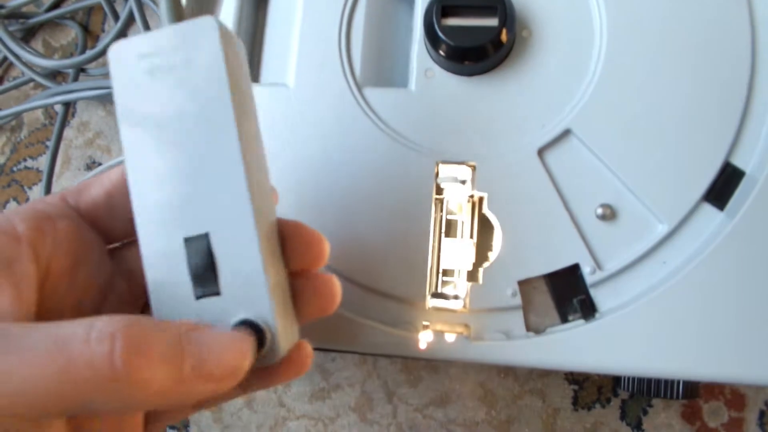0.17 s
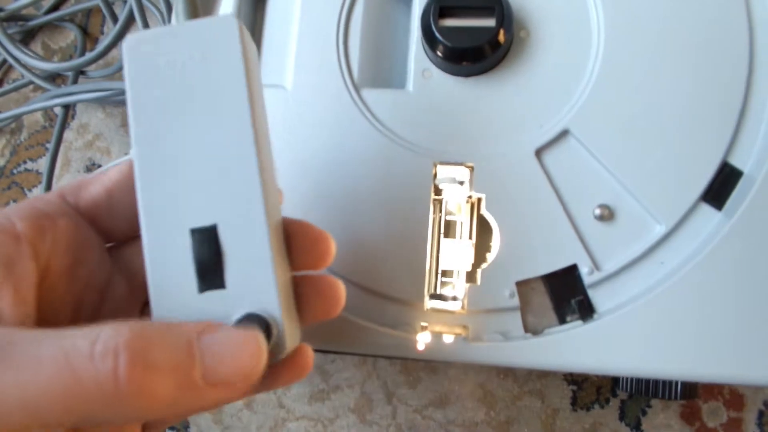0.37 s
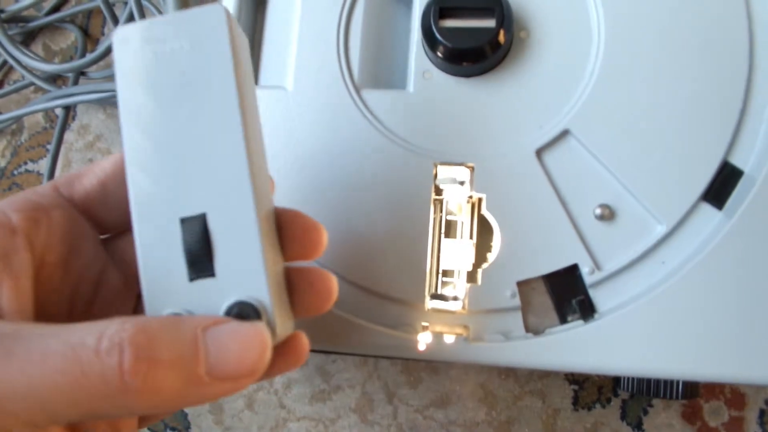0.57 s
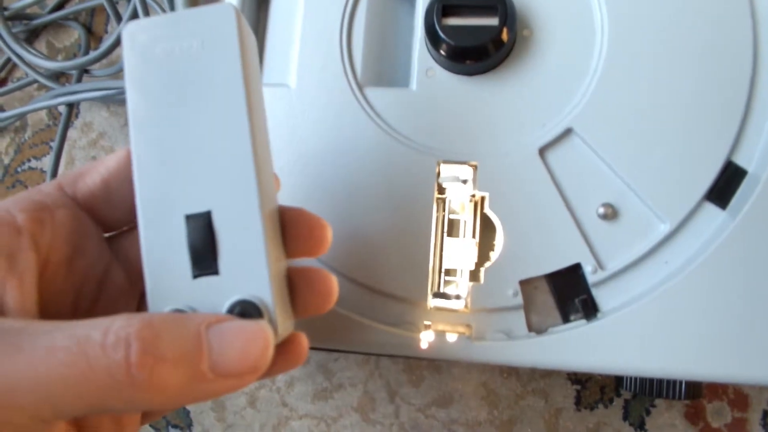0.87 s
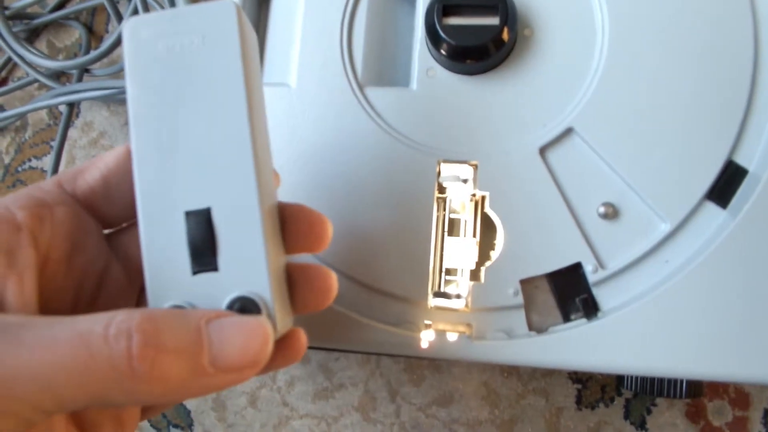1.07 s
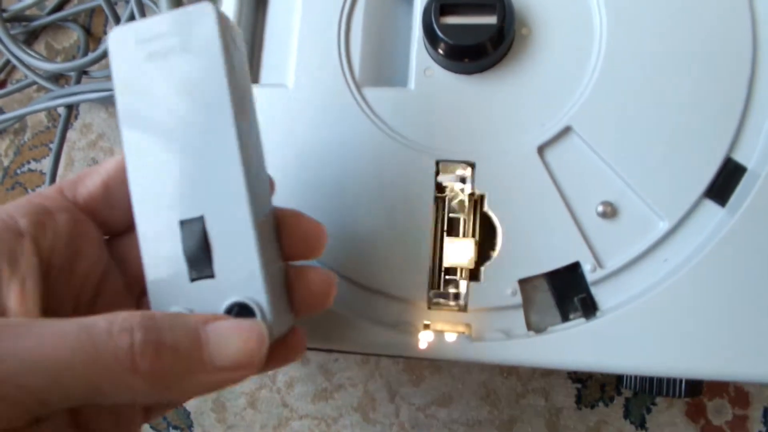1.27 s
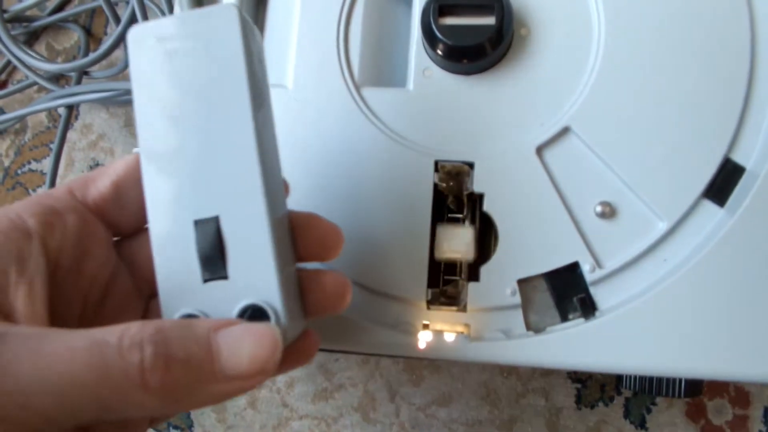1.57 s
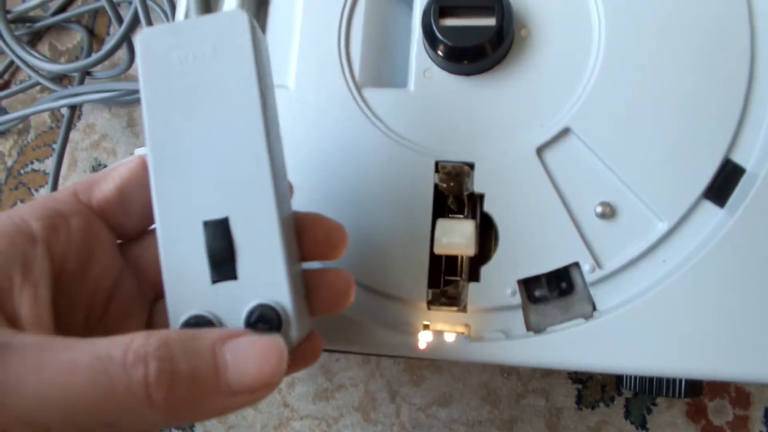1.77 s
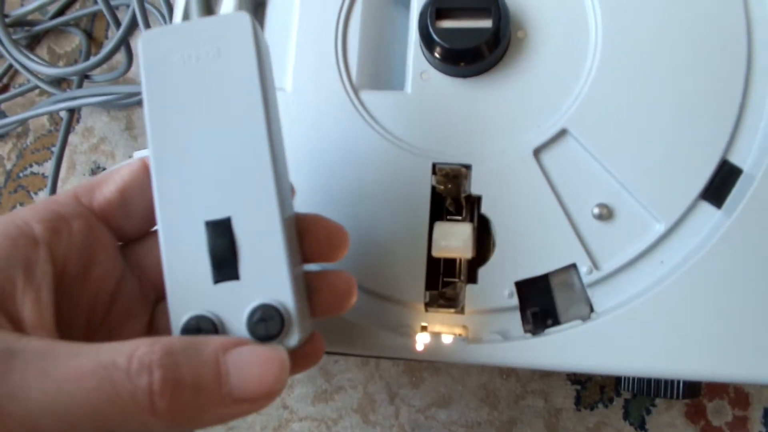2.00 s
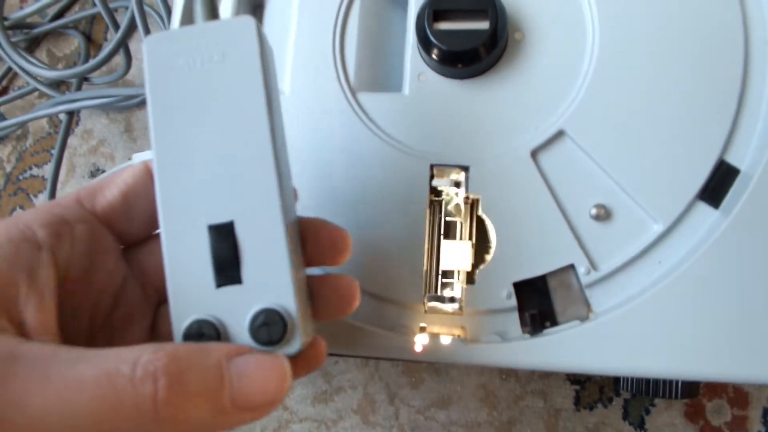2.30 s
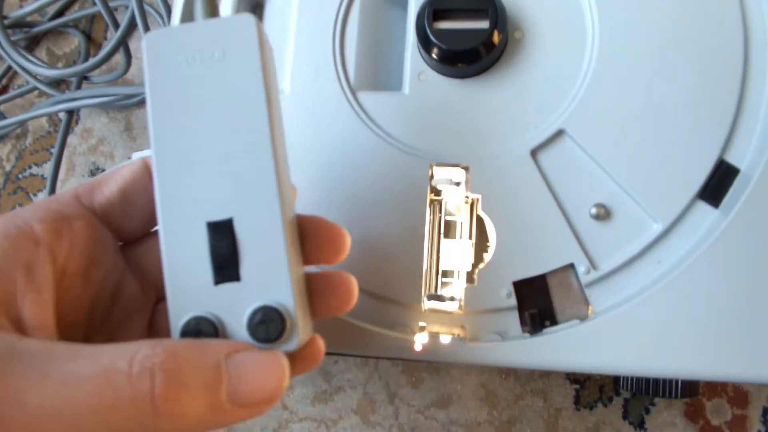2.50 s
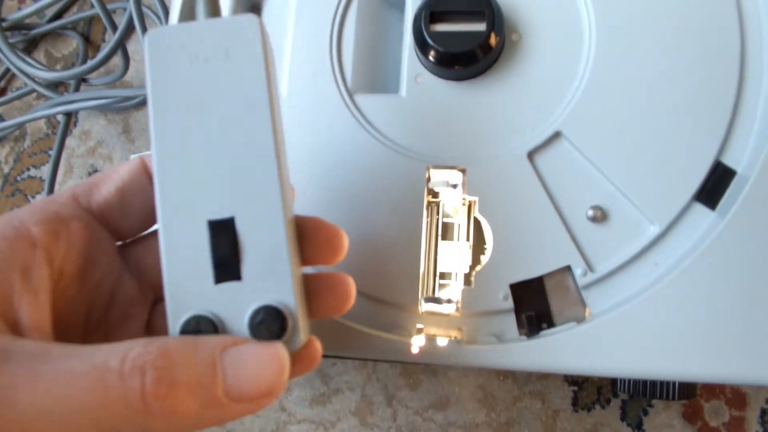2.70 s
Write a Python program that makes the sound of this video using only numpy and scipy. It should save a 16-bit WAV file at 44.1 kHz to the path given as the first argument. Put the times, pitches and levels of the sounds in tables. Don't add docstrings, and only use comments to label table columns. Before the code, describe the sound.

A slide projector finishes one change with a quick burst of clacks, idles with its fan whirring, then runs through a longer clattering change and settles, heard close in stereo in a small carpeted room.

```python
import sys
import numpy as np
from scipy import signal
from scipy.fft import rfft, irfft, next_fast_len
from scipy.io import wavfile
from scipy.ndimage import uniform_filter1d

SR = 44100
rng = np.random.default_rng(int(sys.argv[2]) if len(sys.argv) > 2 else 0)


def unload_audio(sound):
    columns = np.transpose(np.atleast_2d(sound))
    steps = np.round(np.clip(columns, -1, 1) * 32767)
    wavfile.write(sys.argv[1], SR, steps.astype(np.int16))


def rack_gain(trim_db):
    fader = np.asarray(trim_db, float)
    return 10 ** (fader / 20)


N = 125685

# (frequency [Hz], density [dB per Hz])
AIR_COLOUR = [(15, -80), (25, -36), (318, -6.5), (761, -4.5), (824, -7.5), (966, -12.5), (1160, -14),
              (14000, -44.5)]
# (frequency [Hz], width [Hz], lift [dB])
DUCT_RESONANCES = [(265, 32, -2), (312, 101, 10.5), (620.3, 47, 9), (1585, 410, 5.5), (3060, 1070, 5.5),
                   (5160, 480, 6), (7200, 430, 9)]
# (time [s], speed [turns/s])
SHAFT_SPEED = [
    (0, 46.7),
    (.25, 47.4),
    (1.2, 47.4),
    (1.35, 46.9),
    (1.6, 46.7),
    (1.75, 47),
    (2, 46.2),
    (2.15, 46.8),
    (2.4, 46.9),
    (2.55, 47.4),
]
# (shaft order, mains sideband, idle level [dB], loaded level [dB])
MOTOR_TONES = [(15, 0, -61, -60), (18, 0, -66, -52), (19, 0, -63, -63), (24, 0, -57, -60),
               (15, 1, -50, -60)]
# (time [s], peak [dB], chatter t60 [s], centre [Hz])
STEEL_TICKS = [(.0218, -19.5, 0.028, 9300), (.1241, -32, 0.023, 11700), (.129, -32, 0.077, 7940),
               (.1404, -40, .012, 8000), (.1645, -39, 0.053, 10300), (.188, -38, 0.084, 10000),
               (1.1363, -35, 0.0076, 11000), (1.147, -28, 0.035, 9800), (1.1635, -28.5, 0.034, 9000),
               (1.1907, -51, 0.026, 5860), (1.2473, -33.5, 0.02, 11200), (1.2822, -32, 0.013, 12000),
               (1.4596, -37, 0.053, 9700), (1.4815, -24.5, 0.06, 10100), (1.6187, -33.5, 0.013, 7000),
               (1.6318, -35, 0.017, 6100), (1.6464, -33.5, 0.014, 7460), (1.7458, -37, 0.0079, 7100),
               (1.7520, -18, 0.022, 6450), (1.7765, -32.5, 0.031, 10700), (1.8205, -35.5, 0.015, 8800),
               (1.8427, -28, 0.012, 12200), (1.9022, -40.5, 0.034, 8260), (2.2184, -46, 0.05, 6400),
               (2.2697, -20.5, 0.029, 8600), (2.3725, -28, 0.016, 11900)]
# (time [s], peak [dB], chatter t60 [s], centre [Hz])
GATE_SETTLING = [
    (2.377, -38, 0.25, 8900),
    (2.387, -23.5, 0.0064, 7440),
    (2.434, -40, 0.064, 13800),
    (2.794, -43, 0.0062, 5960),
]
# (time [s], peak [dB], chatter t60 [s], centre [Hz])
LEVER_CLACKS = [(.0225, -30, 0.023, 2750), (.0832, -39, 0.029, 1770), (0.1235, -25, 0.12, 2030),
                (0.1622, -31.5, 0.11, 2210), (0.188, -36.5, 0.12, 2220), (1.150, -19.5, 0.069, 2010),
                (1.1640, -23, 0.037, 2370), (1.1907, -30.5, 0.022, 1500), (1.212, -33, 0.021, 2440),
                (1.2477, -21.5, 0.0071, 1740), (1.282, -24.5, 0.023, 1970), (1.481, -29, 0.084, 2640),
                (1.6468, -30.5, 0.013, 3000), (1.7458, -31, 0.031, 2250), (1.7512, -24, 0.049, 2840),
                (1.7755, -35.5, 0.067, 2300), (1.8430, -31, 0.022, 2500), (2.1900, -32, 0.022, 1520),
                (2.218, -30.5, 0.039, 2500), (2.2700, -31, 0.03, 2460), (2.3725, -24.5, 0.069, 1960),
                (2.3875, -25, 0.071, 2300), (2.3976, -23, 0.068, 1630), (2.4104, -31.5, 0.19, 2260),
                (2.4353, -38, 0.21, 2070)]
# (time [s], peak [dB], chatter t60 [s], centre [Hz])
LEVER_TAPS = [(.0835, -34, 0.011, 1790), (.1717, -31, 0.014, 1950), (.195, -37, 0.0091, 2540),
              (1.899, -43, .005, 2800), (1.9035, -43.5, 0.015, 2110), (1.8205, -41, 0.018, 2730),
              (2.3722, -27.5, 0.0081, 1920), (2.4005, -22, 0.0052, 1380), (2.411, -29, 0.011, 2300)]
# (time [s], peak [dB], chatter t60 [s], centre [Hz])
LINK_RATTLES = [(.1238, -35.5, .03, 5570), (.1275, -36, 0.024, 5000), (.1328, -37, 0.07, 3900),
                (.165, -52, .07, 4540), (.188, -46, .03, 5200), (.197, -47, .08, 4700),
                (1.150, -35, .05, 5000), (1.1635, -32.5, 0.034, 5230), (1.191, -38, 0.033, 4470),
                (1.2472, -34, 0.016, 4470), (1.2818, -40.5, 0.021, 4730), (1.4598, -40.5, 0.048, 4730),
                (1.4812, -29, .02, 5800), (1.487, -33, 0.053, 4400), (1.6465, -38.5, 0.025, 4400),
                (1.7458, -28.5, 0.018, 4840), (1.7762, -36, .04, 4350), (1.8202, -40, 0.038, 4670),
                (1.8425, -35, 0.012, 3600), (1.902, -39.5, 0.035, 4500), (2.190, -46, .015, 4400),
                (2.2184, -37, 0.035, 4700), (2.270, -33.5, 0.031, 4400), (2.3722, -34, .04, 5460),
                (2.3875, -31, 0.012, 4940), (2.395, -42, .1, 4400), (2.435, -47, .06, 5200)]
# (time [s], peak [dB], chatter t60 [s])
HOUSING_THUDS = [(0.125, -31, 0.035), (0.132, -26, 0.058), (0.168, -30.5, 0.093), (0.193, -41, 0.022),
                 (1.149, -31, 0.049), (1.164, -25.5, 0.065), (1.193, -25, 0.022), (1.216, -32, 0.025),
                 (1.287, -31, 0.065), (1.467, -32, 0.029), (1.48, -29, 0.023), (2.19, -33.5, 0.15),
                 (2.218, -32, 0.097), (2.373, -25, 0.057), (2.383, -28.5, 0.14), (2.418, -34.5, 0.052),
                 (2.437, -32.5, 0.087)]
# (time [s], peak [dB])
CASE_JOLTS = [
    (0.129, -46),
    (1.249, -49),
    (1.281, -50),
    (2.375, -48),
]
# (time [s], peak [dB], chatter t60 [s], centre [Hz])
LEVER_KNOCKS = [
    (.1395, -14, 0.011, 2191),
    (1.1358, -19.5, 0.0048, 2090),
    (1.1360, -22, 0.0054, 3960),
    (1.6180, -26, 0.013, 2820),
    (1.6314, -22.5, 0.007, 1960),
    (1.6320, -23.5, 0.0077, 3960),
]
# (time [s], peak [dB], chatter t60 [s], centre [Hz])
PANEL_BOOMS = [
    (.192, -27, .02, 693),
    (1.2655, -37, 0.0045, 990),
    (1.478, -32.5, 0.035, 557),
    (1.482, -35.5, 0.027, 794),
    (1.4915, -31.5, 0.025, 596),
    (2.383, -30, 0.014, 683),
    (2.421, -28.5, .015, 648),
]
# (start [s], stop [s], pitch [Hz], level [dB], t60 [s])
SPRING_RING = (1.249, 1.283, 2520, -32.5, .14)
# (frequency [Hz], level [dB])
STEEL_MODES = [(4700, -5), (5700, -2), (7000, 1), (7900, 0), (9050, 2), (10300, -2), (11750, 2), (13200, 1),
               (14800, -4), (15700, -20)]
# (frequency [Hz], level [dB])
PLASTIC_MODES = [(1240, 0), (1470, 0.026), (1800, 0.0038), (2050, 0.041), (2250, 0), (2550, 0), (2850, 0),
                 (3300, 0), (3800, 0), (4400, 0)]
# (frequency [Hz], level [dB])
HOUSING_MODES = [(340, 4.5), (520, 1), (600, 5), (700, 3), (790, 0), (950, 0), (1050, -7)]
LINK_MODES = [3300, 3624, 4055, 4400, 4770, 5190, 5655, 5950, 6570]
# (frequency [Hz], t60 [s])
ROOM_DECAY = [(300, 0.44), (15000, 0.17)]
# (frequency [Hz], side minus mid [dB])
STEADY_WIDTH = [(60, 0), (180, -16), (550, -18.5), (1650, -5), (4970, 0.5), (15000, 0)]
# (frequency [Hz], left minus right [dB])
STEADY_LEAN = [(60, -1.5), (150, -0.5), (380, -0.5), (950, -1.5), (2380, -6), (5980, 1), (15000, -0.5)]
# (frequency [Hz], side minus mid [dB])
HIT_WIDTH = [(60, -21), (240, -45), (950, -8), (3770, -2), (15000, -0.5)]
# (frequency [Hz], left minus right [dB])
HIT_LEAN = [(150, -1), (500, -0.5), (1000, -3.5), (2200, -10), (4000, -1.5), (8000, -3.5), (15000, 0.5)]

AIR_DB = -44.8
IDLE_HZ, LOAD_SAG_HZ, MAINS_BEAT_HZ = 47.4, .5, 100
WHINE_DB, WAVER_DB, WAVER_RAD = -75.5, 3.5, .15
FIRST_BLOW = 4.16
RING_DB, RING_LONGER, RING_ABOVE_HZ = 5, 9, 8500
BOUNCE_DB, BOUNCE_S = 3.5, .0015
JOLT_S = .0019
ROOM_DB = -19.5
DIRECT_SHARE = .55


def evened(x):
    return x / np.sqrt(np.mean(x ** 2) + 1e-20)


def read(points, hz):
    f, value = np.transpose(points)
    return np.interp(np.log(hz + 1), np.log(f + 1), value)


def drift(rate_hz):
    t = np.arange(N) / SR
    rates = np.geomspace(.3, rate_hz, num=12)
    return evened(sum(np.sin(2 * np.pi * (f * t + rng.random())) / np.sqrt(f) for f in rates))


def stereo(mid, side, width_table, lean_table):
    hz = np.fft.rfftfreq(N, 1 / SR)
    m = rfft(mid)
    s = rfft(side) * rack_gain(read(width_table, hz))
    lean = read(lean_table, hz) / 2
    return irfft(np.array([(m + s) * rack_gain(lean), (m - s) * rack_gain(-lean)]), N)


def fan_air(patchy_db=1.2, swell_db=.35, flicker_db=.8):
    frames, hz = N // 256 + 5, np.fft.rfftfreq(1024, 1 / SR)
    a, b, c, d, patches = rng.standard_normal((frames, 513, 5)).T
    patches = uniform_filter1d(patches, size=14, axis=0)
    patches = evened(uniform_filter1d(patches, size=10, axis=1))
    swell = np.interp(np.arange(frames) * 256, np.arange(N), drift(4.74))
    flicker = rng.standard_normal(frames) * (hz[:, None] > 2000)
    duct = sum(db / (1 + (2 * (hz - f) / w) ** 2) for f, w, db in DUCT_RESONANCES)
    colour = read(AIR_COLOUR, hz) + duct - 30 * (hz > 14300)
    level = colour[:, None] + patchy_db * patches + swell_db * swell + flicker_db * flicker
    z = np.array([a + 1j * b, c + 1j * d]) * rack_gain(level)
    air = signal.istft(z, nperseg=1024, noverlap=768)[1][:, :N]
    return rack_gain(AIR_DB) * evened(air)


def motor():
    t = np.arange(N) / SR
    speed = np.interp(t, *np.transpose(SHAFT_SPEED))
    load = np.clip((IDLE_HZ - speed) / LOAD_SAG_HZ, 0, 1)
    turns = np.cumsum(speed + .04 * drift(3)) / SR
    whine = [(order, 0, WHINE_DB, WHINE_DB) for order in range(30, 56)]
    wavers = [drift(14) for _ in range(4)]
    out = np.zeros((2, N))
    for k, (order, sideband, idle_db, load_db) in enumerate(list(MOTOR_TONES) + whine):
        cycles = order * turns + sideband * MAINS_BEAT_HZ * t + rng.random()
        angle = 2 * np.pi * cycles + WAVER_RAD * wavers[(k + 1) % 4]
        level_db = idle_db + (load_db - idle_db) * load + WAVER_DB * wavers[k % 4]
        out += np.sqrt(2) * rack_gain(level_db) * np.array([np.sin(angle), np.cos(angle)])
    return out


def strikes(rows, modes, sharpness, spread, rise_s, grit_db):
    size = 8192
    out = np.zeros((2, N + size))
    t, hz = np.arange(size) / SR, np.fft.rfftfreq(size, 1 / SR)
    mode_hz, mode_db = np.transpose(modes)
    column_hz = mode_hz[:, None]
    off = 1j * sharpness * (hz ** 2 - column_hz ** 2) / column_hz
    core = rack_gain(RING_DB) * (column_hz > RING_ABOVE_HZ) * hz / (hz + RING_LONGER * off)
    shapes = hz / (hz + off) + core
    for s, db, t60, centre_hz in rows:
        draw = rng.standard_normal((3, size))
        sign = rng.choice([-1, 1], (2, len(modes)))
        clumps = evened(uniform_filter1d(draw[2], size=round(BOUNCE_S * SR)))
        clumps = clumps * np.minimum(t / BOUNCE_S / 10, 1)
        level_db = grit_db * draw[2] + BOUNCE_DB * clumps - 60 * t / t60
        chatter = draw[:2] * rack_gain(level_db) * np.minimum(t / rise_s, 1)
        chatter[:, round(rise_s * SR)] += FIRST_BLOW
        excited_db = mode_db - 10 * (np.log(mode_hz / centre_hz) / spread) ** 2
        body = (sign * rack_gain(excited_db)) @ shapes
        softness = (1 + 1j * hz / (3.1 * centre_hz)) ** 2
        sound = irfft(rfft(chatter) * body / softness, size)
        at = round(s * SR)
        out[:, at:at + size] += rack_gain(db) * sound / abs(sound).max(axis=1, keepdims=True)
    return out[:, :N]


def steel_ticks():
    return strikes(list(STEEL_TICKS) + list(GATE_SETTLING), STEEL_MODES, 10., .9, .0008, 3.5)


def lever_clacks():
    return strikes(LEVER_CLACKS, PLASTIC_MODES, 12., .45, .0008, 4.)


def room(x):
    taps = np.zeros((2, SR // 2))
    at = np.arange(200, SR // 2 - 20, 20)
    at = at + rng.integers(0, 20, (2, len(at)))
    taps[[[0], [1]], at] = rng.choice([-1., 1.], at.shape)
    hz, t, z = signal.stft(taps, SR, nperseg=256)
    decay = rack_gain(-60 * t / read(ROOM_DECAY, hz)[:, None])
    tail = signal.istft(z * decay, SR, nperseg=256)[1]
    return signal.fftconvolve(x, tail / np.linalg.norm(tail[0]), axes=1)[:, :N]


def lever_taps():
    return strikes(LEVER_TAPS, PLASTIC_MODES, 18., .12, .0008, 3.)


def link_rattles():
    return strikes(LINK_RATTLES, [(hz, 0) for hz in LINK_MODES], 22., .3, .0005, 5.)


def housing_thuds():
    return strikes([(*row, 650) for row in HOUSING_THUDS], HOUSING_MODES, 9., .89, .00134, 1.25)


def case_jolts():
    t, out = np.arange(N) / SR, np.zeros((2, N))
    for s, db in CASE_JOLTS:
        u = np.clip((t - s) / JOLT_S, 0, 40)
        out += rack_gain(db) * np.e * u * (2 - u) * np.exp(-2 * u)
    return out


def lever_knocks():
    return strikes(LEVER_KNOCKS, PLASTIC_MODES, 18., .12, .0012, 3.)


def panel_booms():
    return strikes(PANEL_BOOMS, HOUSING_MODES, 12., .1, .002, 1.5)


def spring():
    start, stop, hz, db, t60 = SPRING_RING
    t = np.arange(N) / SR - start
    fade_in = np.clip(t / .002, 0, 1)
    damping = np.clip((stop - start - t) / .0043, 0, 1)
    ring = rack_gain(db - 60 * abs(t) / t60) * fade_in * damping
    angle = 2 * np.pi * hz * t
    return ring * np.array([np.sin(angle), np.cos(angle)])


def scene():
    steady = stereo(*(fan_air() + motor()), STEADY_WIDTH, STEADY_LEAN)
    parts = steel_ticks() + lever_clacks() + lever_taps() + link_rattles() + housing_thuds()
    parts += case_jolts() + lever_knocks() + panel_booms() + spring()
    mid, side = parts + rack_gain(ROOM_DB) * room(parts)
    turned_mid = signal.hilbert(mid, next_fast_len(N))[:N].imag
    side = DIRECT_SHARE * turned_mid + np.sqrt(1 - DIRECT_SHARE ** 2) * side
    return stereo(mid, side, HIT_WIDTH, HIT_LEAN) + steady


def low_pass(x):
    return signal.sosfilt(signal.butter(12, 16820, fs=SR, output="sos"), x)


def record(dry):
    return low_pass(dry)


dry = scene()
out = record(dry)
unload_audio(out)
```